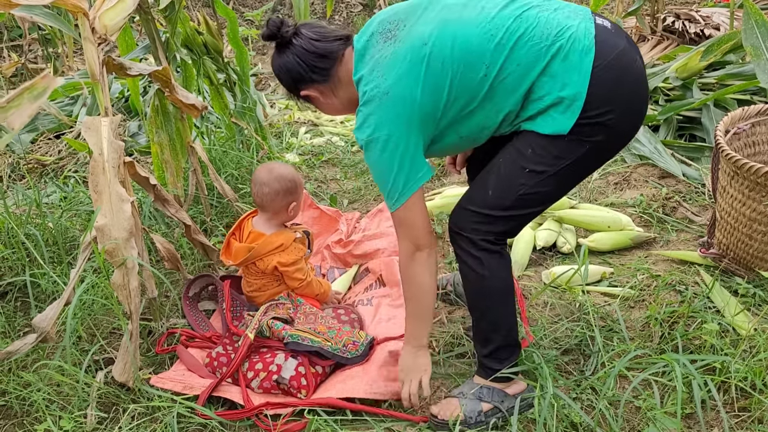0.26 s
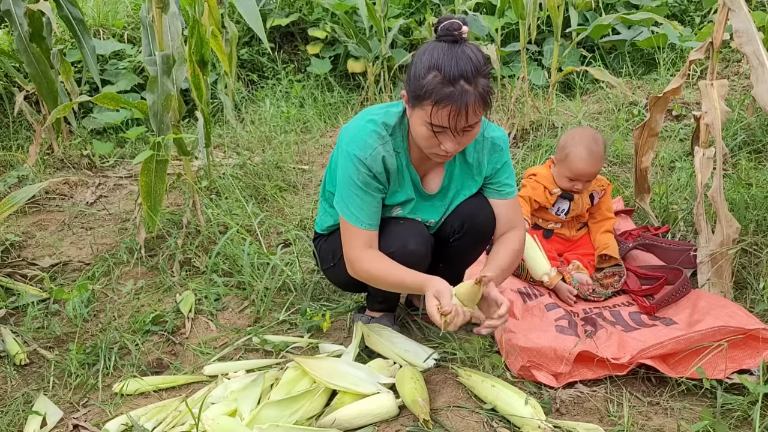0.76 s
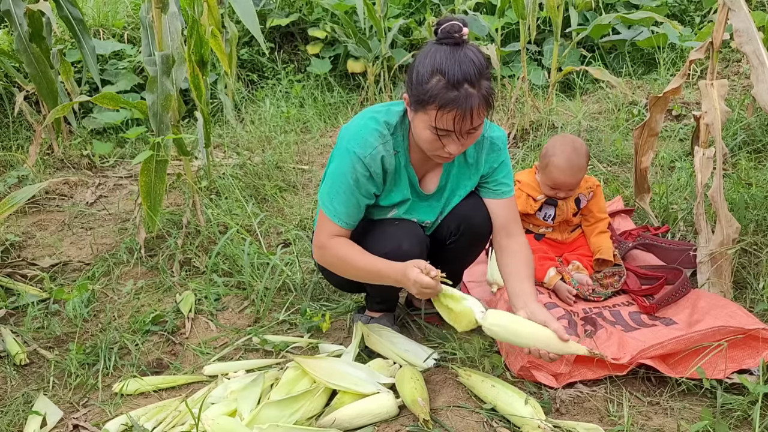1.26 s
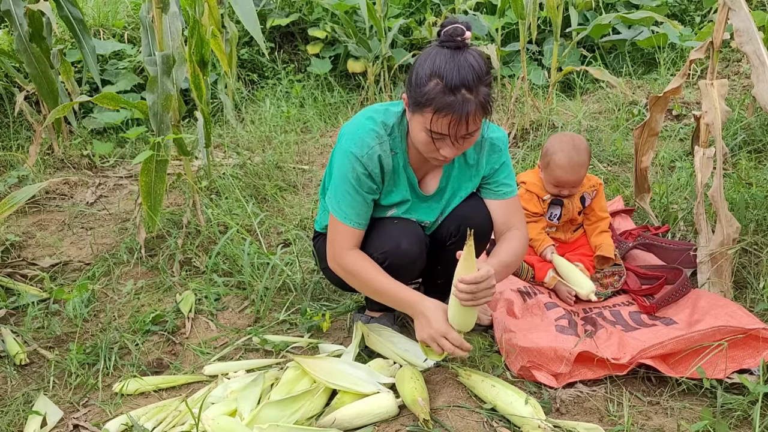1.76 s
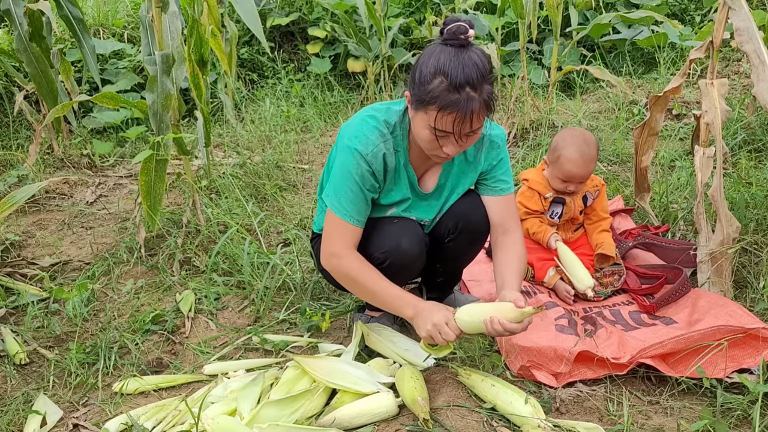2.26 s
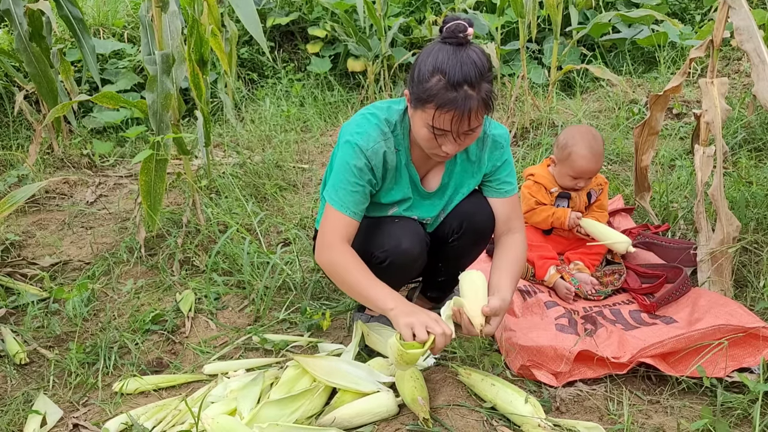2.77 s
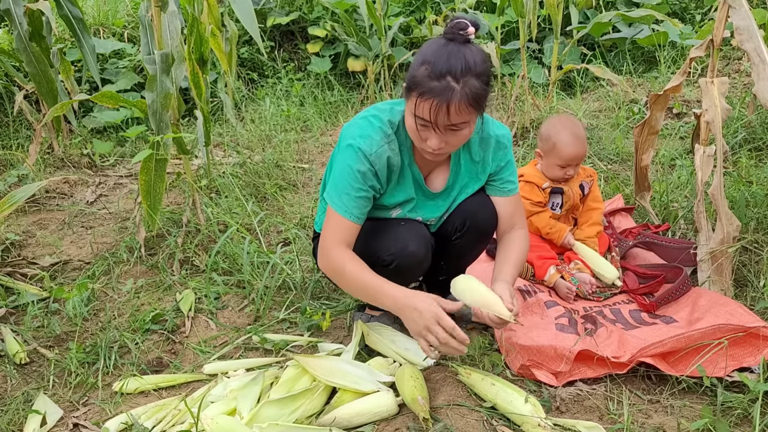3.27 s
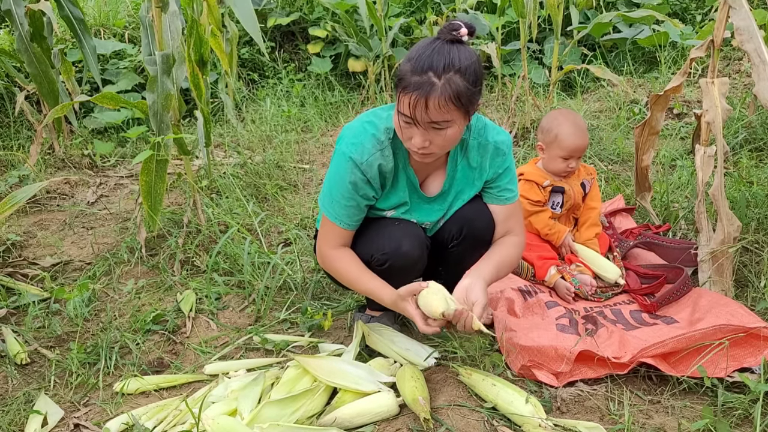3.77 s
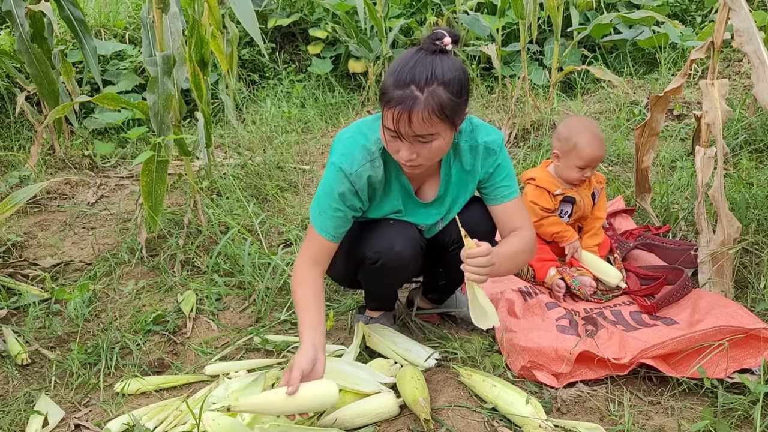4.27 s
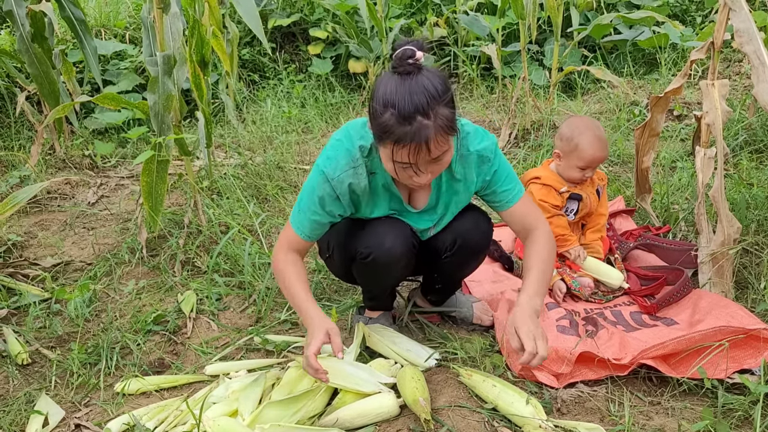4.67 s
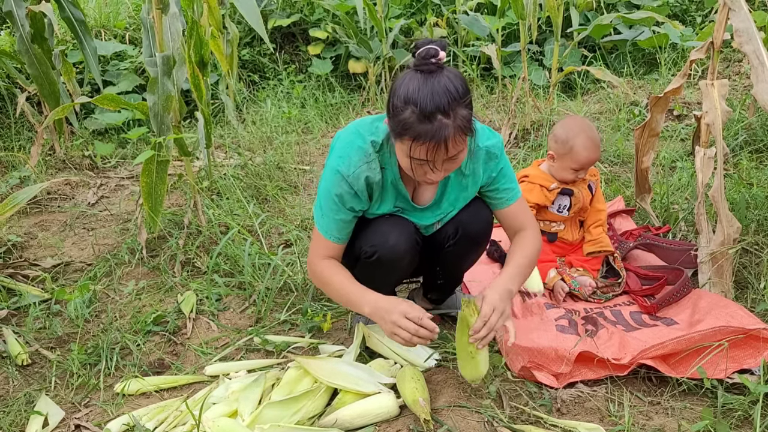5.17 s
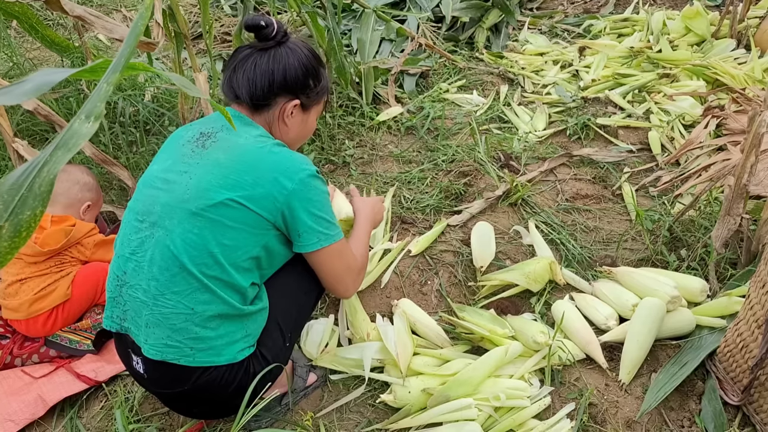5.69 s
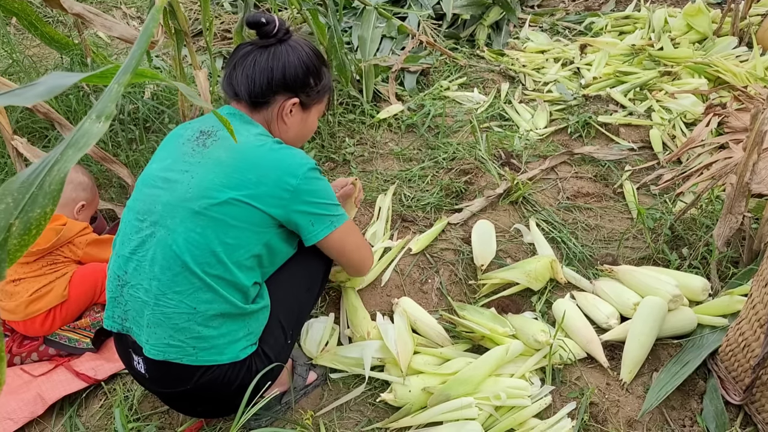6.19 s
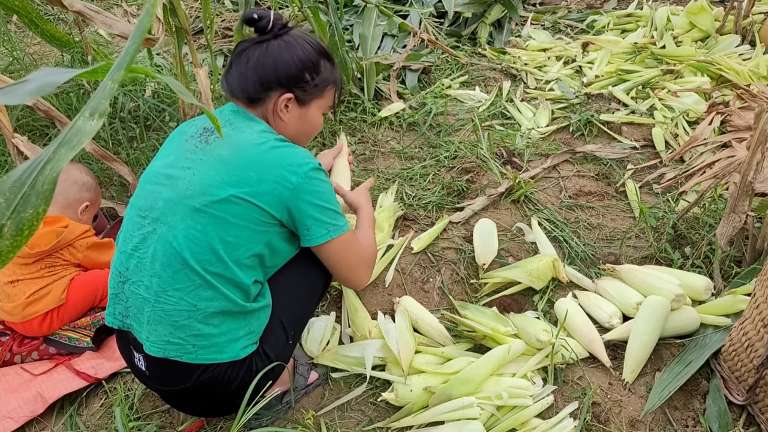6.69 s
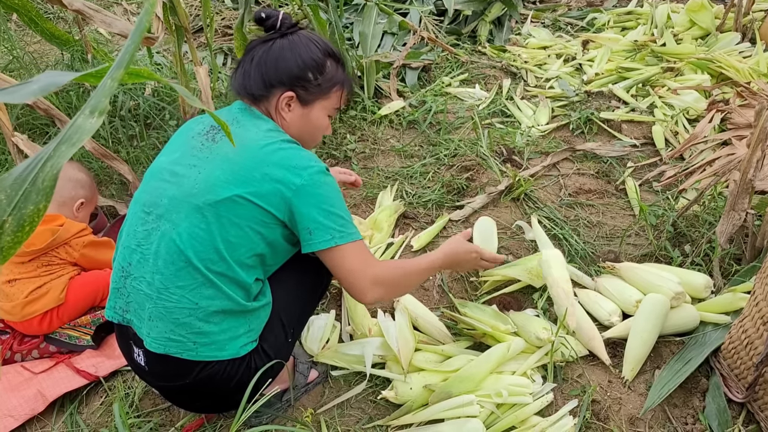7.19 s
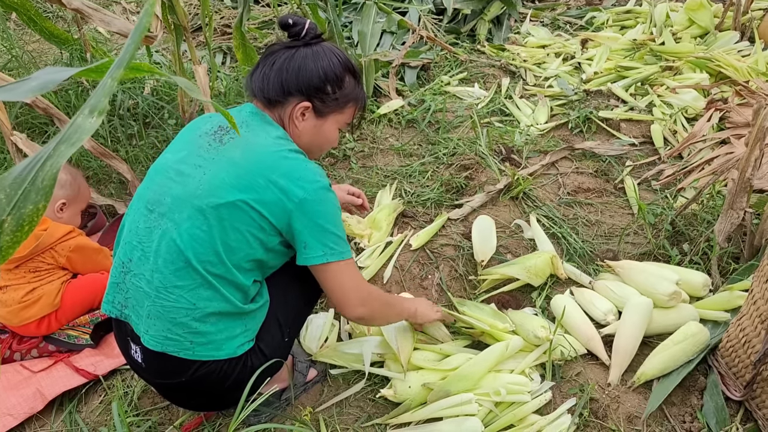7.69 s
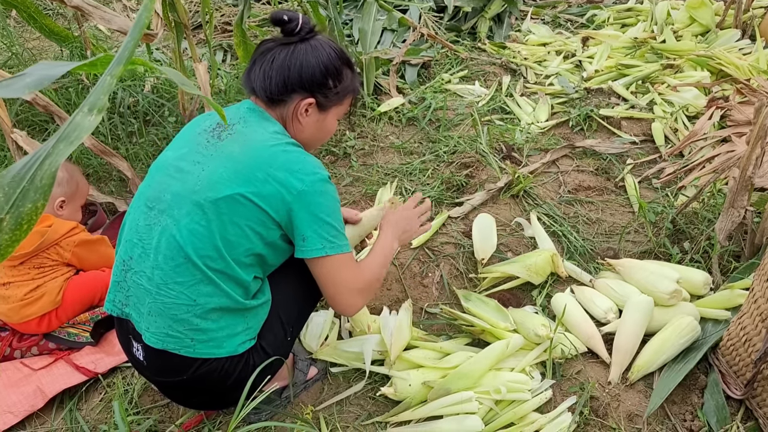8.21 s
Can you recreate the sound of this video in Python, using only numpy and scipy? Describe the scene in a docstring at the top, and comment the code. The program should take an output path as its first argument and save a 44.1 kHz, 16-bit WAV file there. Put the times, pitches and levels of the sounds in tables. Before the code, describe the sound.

Green husk leaves rip and crackle loudly, then rustle quietly with scattered snaps and dull cob knocks, faint insects and low air around.

```python
"""Fresh corn is husked by hand close to the microphone, at the edge of a field.
Leaves rip in clumps of tiny fibre breaks coloured by leaf resonances; stalks snap as ringing bursts,
and cobs and hands knock as damped modes. Crickets pulse as raspy tones in the grass, far birds chip
in gliding tones, and filtered noise makes a rumble of air, a soft hush and a faint hiss.
The sound drops out briefly past the middle; after that the work is heard from behind the body."""
import sys
import numpy as np
from scipy import signal
from scipy.fft import rfft, irfft, next_fast_len
from scipy.io import wavfile
from scipy.ndimage import uniform_filter1d

SR = 44100
rng = np.random.default_rng(int(sys.argv[2]) if len(sys.argv) > 2 else 0)


def dump_mix(stems):
    """Bounce the given channels to the path in sys.argv[1] as a 16-bit WAV at rate SR."""
    frames = np.atleast_2d(stems).T  # one column per channel
    limited = np.clip(frames, -1, 1)  # hard clip at full scale
    pcm = np.round(limited * 32767).astype(np.int16)
    wavfile.write(sys.argv[1], SR, pcm)


N = 372644
TIME = np.arange(N) / SR
DROPOUT_START_S, DROPOUT_END_S = 5.53, 5.586

# colour of a flexing leaf, also of snaps: (frequency [Hz], relative level [dB])
LEAF_SPECTRUM = [(100, -16.5), (300, -7), (470, -13), (760, -3), (1080, -7), (1280, 3), (1800, -1),
                 (2400, -4), (2900, -10), (4000, -17.5), (8000, -63.5)]
# colour of parting fibres, also of snaps: (frequency [Hz], relative level [dB])
FIBRE_SPECTRUM = [(500, -46), (1800, -15.5), (2800, -7), (3400, -5.5), (4600, 1), (5600, -1), (6600, -2.5),
                  (7800, -1), (8800, -6.5), (10200, -3), (11700, -0.5), (13500, -5.5), (15500, -4.5)]
# broad resonances of a husk leaf, strongest when only rubbed: (frequency [Hz], width [Hz], relative gain)
LEAF_RESONANCES = [(1910, 600, 1.08), (4400, 800, 0.95)]
MIDDLING_DB = -51   # fibre level of a middling stroke, before the trim
FLEX_OCTAVES = 0.06   # spread of the resonances as the leaf bends


def tearing(middling_breaks_per_s=2600, tear_db=-30):
    """A harder pull breaks more fibres and shakes the whole leaf; a light rub sounds mostly its resonances."""
    leaf_db, fibre_db = pulling()
    force = 1 / (1 + from_db(tear_db - fibre_db))   # 0 rubbing, 1 ripping
    breaks_per_s = middling_breaks_per_s * from_db(.4 * (fibre_db - MIDDLING_DB))
    breaks = fibre_breaks(breaks_per_s, spread_db=1.0, clump_db=1.24, friction=0.4)
    leaf = colour(breaks * from_db(leaf_db - 4.5), LEAF_SPECTRUM)
    fibres = colour(breaks * from_db(fibre_db - 3.0), FIBRE_SPECTRUM)
    ring = 0
    for hz, width_hz, gain in LEAF_RESONANCES:
        bent_hz = hz * 2 ** (FLEX_OCTAVES * drift(25))
        ring = ring + gain * from_db(0.83 * drift(12)) * gliding_resonance(leaf + fibres, bent_hz, width_hz)
    return fibres + leaf * (1 + force) / 2 + ring * (1 - force)


# strokes of the hands on the husk, levels before the trims in tearing():
# (time [s], length [s], flexing leaf level [dB], parting fibre level [dB], swell from start to end [dB])
HAND_STROKES = [(0.299, 0.07, -60.5, -58, 5), (.48, 0.074, -59.5, -58.5, -1),
                (0.606, 0.031, -50.5, -52.5, -8), (0.777, 0.1, -57, -59.5, -14),
                (0.948, 0.093, -56.5, -54, 22), (1.116, 0.044, -38, -28, 5), (1.149, 0.074, -28, -30, 0),
                (1.225, 0.095, -29.5, -30, 6.5), (1.499, 0.063, -56.5, -55, -4),
                (1.597, 0.12, -60.5, -54.5, 17), (1.73, 0.35, -60, -55.5, -2.5),
                (2.737, 0.135, -47.5, -35, 10), (2.89, 0.044, -43.5, -38.5, 6),
                (2.948, 0.11, -51.5, -41, -1), (3.034, 0.29, -53.5, -48, 9), (3.544, .2, -51.5, -50, 6),
                (3.902, 0.078, -48, -55.5, 10.5), (3.968, 0.11, -44, -43.5, 5),
                (4.081, 0.032, -40.5, -36, 10), (4.545, 0.088, -49.5, -45.5, -4),
                (4.666, 0.049, -52, -51.5, 4), (4.915, 0.2, -68, -60.5, -4.5),
                (5.233, 0.078, -48, -50.5, 3), (5.346, 0.11, -61.5, -63, 1), (5.783, 0.12, -54.5, -55, 4.5),
                (5.941, 0.21, -60, -53.5, -0.5), (6.379, 0.081, -60, -59.5, 11),
                (6.481, 0.15, -48, -48.5, -5.5), (6.732, 0.19, -55.5, -53, -8),
                (7.335, 0.057, -50, -46.5, -17), (7.407, 0.13, -50, -48.5, -6),
                (7.588, 0.057, -57.5, -52, 7.5), (7.741, 0.22, -57.5, -54, 4.5),
                (8.136, 0.063, -58.5, -56.5, -0.5)]
HELD_LEAF_DB, HELD_FIBRE_DB = -70.5, -71   # husk merely held between strokes, before the same trims
ATTACK_SHARE = .25   # share of a stroke in which the grip builds up
# release rate after a middling stroke; harder pulls let go faster, by this many dB per dB
MIDDLING_RELEASE_DB_PER_S, RELEASE_FOLLOWS = 340.5, 0.3


def pulling():
    """Each stroke grips, swells or slackens as the leaf slides, then lets go: leaf and fibre level in dB."""
    power = from_db([[HELD_LEAF_DB], [HELD_FIBRE_DB]]) ** 2 * np.ones(N)
    t = np.arange(SR) / SR
    for s, length, leaf_db, fibre_db, swell_db in HAND_STROKES:
        grip = np.minimum(t / (ATTACK_SHARE * length), 1)
        release_rate = MIDDLING_RELEASE_DB_PER_S * from_db(RELEASE_FOLLOWS * (fibre_db - MIDDLING_DB))
        release_db = release_rate * np.maximum(t - length, 0)
        slide_db = swell_db * (np.minimum(t / length, 1) - .5)
        envelope = grip * from_db(slide_db - release_db)
        add(power, s, (from_db([[leaf_db], [fibre_db]]) * envelope) ** 2)
    return 10 * np.log10(power)


def fibre_breaks(per_s, spread_db, clump_db, friction):
    """Tiny breaks of uneven size come in clumps, over the smooth rub of leaf on leaf."""
    born = rng.random(N) < per_s / SR
    sizes = born * from_db(spread_db * np.minimum(rng.exponential(1, N), 4))
    # even out the running level, so that the strokes alone set it
    sizes = sizes / np.sqrt(uniform_filter1d(sizes ** 2, size=1500).clip(0) + 1e-6)
    breaks = (sizes + friction) * stereo_noise(N) * catches() * from_db(clump_db * drift(220))
    return breaks / np.sqrt(uniform_filter1d(np.mean(breaks ** 2, axis=0), size=1500) + 1e-9)


def catches(per_s=130, size=1.5, release_s=0.0011):
    """A thicker fibre holds now and then, and gives way with a fine tick: a gain that jumps and dies down."""
    gives = (rng.random(N) < per_s / SR) * np.minimum(rng.exponential(1, N), 2)
    return 1 + size * signal.lfilter([1], [1, -np.exp(-1 / (release_s * SR))], gives + 1e-18)


def hand_echo(x, share, delay_s, travel=.25):
    """A reflection off the moving hands and the ground: its comb shifts the colour."""
    late = delay_s * (1 + travel * drift(6))
    return x + share * np.array([np.interp(TIME - late, TIME, side) for side in x])


# ribs and stalks that break close by: (time [s], level before placing [dB], ring frequency [Hz])
STALK_SNAPS = [(0.617, -46.5, 2160), (.892, -45, 7300), (0.962, -41, 4540), (1.038, -35.5, 9400),
               (1.05, -31.5, 9100), (1.15, -22.5, 4600), (1.186, -24.5, 9150), (1.2393, -14.5, 1310),
               (1.2556, -19, 1290), (1.269, -13.5, 1570), (1.2823, -18.5, 1560), (1.294, -19, 2060),
               (1.302, -21, 1380), (1.309, -21.5, 4500), (1.319, -17.5, 2590), (1.798, -43, 1940),
               (1.811, -38.5, 2150), (1.906, -23.5, 9200), (2.049, -42, 4260), (2.156, -39.5, 6800),
               (2.3757, -13.5, 2050), (2.383, -17, 1400), (2.3889, -13, 2860), (2.397, -21, 2100),
               (2.407, -25.5, 2700), (2.8647, -29.5, 2220), (2.926, -33.5, 5970), (2.939, -45, 7000),
               (3.152, -40, 4800), (3.289, -34, 2190), (4.5545, -35.5, 3840), (4.568, -29.5, 4000),
               (4.718, -48, 2200), (5.608, -37.5, 4190), (5.849, -38.5, 1400), (6.053, -35, 5270),
               (6.2168, -16, 1810), (6.218, -17.5, 4840), (6.2212, -20, 3070), (6.634, -46, 2480),
               (6.873, -46, 2430), (7.3512, -38.5, 5700), (7.43, -34.5, 10900), (7.498, -37.5, 8950),
               (7.636, -43.5, 11000), (7.92, -41, 4650), (8.16, -46, 2380)]
# thick pieces ring below EVEN_HZ and sound the leaf, thin ones above it and sound the fibres
EVEN_HZ, FIBRE_LEAD_DB, LEAD_OCTAVES = 2000, 17, 1.5


def snapping(ring_gain=2.7, ring_width=0.19, size=2048):
    """Each broken piece rings at its own pitch, and thinner pieces are brighter."""
    t, out = np.arange(size) / SR, np.zeros((2, N))
    for s, db, hz in STALK_SNAPS:
        burst = fracture(t)
        burst = burst + ring_gain * resonance(burst, hz, ring_width * hz)
        bright = from_db(FIBRE_LEAD_DB * np.tanh(np.log2(hz / EVEN_HZ) / LEAD_OCTAVES))
        for spectrum, share in (LEAF_SPECTRUM, 1), (FIBRE_SPECTRUM, bright):
            part = colour(burst, spectrum)
            part = part / np.std(part[:, t < .006])   # the level is that of the first instant
            add(out, s, from_db(db) * share / np.hypot(1, bright) * part)
    return out


SPLINTER_S, SPLINTER_SPREAD_DB = 0.0033, 3   # decay time constant of the splintering; its unevenness


def fracture(t, pulse=3.0, crack=1.0, crack_s=.0009):
    """One sharp pulse and a brief crack as the piece gives way, then splinters that die out."""
    unevenness = from_db(SPLINTER_SPREAD_DB * rng.standard_normal(len(t)).clip(-2, 2))
    splinters = np.exp(-t / SPLINTER_S) * unevenness
    crack_fade = np.exp(-t / crack_s)
    return pulse * (t == 0) + stereo_noise(len(t)) * (crack * crack_fade + splinters * (1 - crack_fade))


# soft knocks of cobs and hands, before placing: (time [s], level [dB], ring frequency [Hz],
# 60 dB decay time [s], share of dull noise [0-1], shift to the right [dB])
SOFT_KNOCKS = [(2.383, -18.5, 391, 0.029, 0.86, -2), (3.285, -41.5, 685, 0.25, 0.6, 0),
               (5.275, -43, 806, 0.19, 0.8, 0), (4.569, -32.5, 700, 0.076, 0.9, 1.5),
               (4.575, -33, 196, 0.18, 0.4, -1), (5.8045, -33, 995, 0.026, 0, 3),
               (6.217, -20, 320, 0.056, 0.26, -4), (6.3702, -32.5, 1005, 0.028, 0.14, 6),
               (6.544, -7.5, 815, 0.0016, 0.2, 13), (7.338, -30, 305, 0.075, 0.26, 0),
               (7.3515, -19.5, 910, 0.0087, 0.6, -5), (7.352, -22, 230, 0.07, 0.31, -3)]
SOFT_CONTACT_HZ = 2300   # padded by leaves, a knock falls off steeply above this


def knocking():
    """Each soft contact is one quickly damped mode and a dull puff of crushed leaves around it."""
    t, out = np.arange(SR // 4) / SR, np.zeros((2, N))
    for s, db, hz, t60, puff, right_db in SOFT_KNOCKS:
        crushed = rms_one(resonance(stereo_noise(len(t)), hz, hz))
        body = (1 - puff) * np.sin(2 * np.pi * hz * t) + puff * crushed
        onset = 1 - np.exp(-t / (0.019 * t60))
        sides = from_db([[-right_db / 2], [right_db / 2]])
        add(out, s, from_db(db - 60 * t / t60) * onset * body * sides)
    return signal.sosfilt(signal.butter(4, SOFT_CONTACT_HZ, fs=SR, output="sos"), out + 1e-18)


# crickets in the grass: (start time [s], end time [s], level before swell and mix [dB],
# middle pitch [Hz], mean pulse rate [1/s], rasp [0-1])
GRASS_CRICKETS = [(.6166, 5.16, -51.7, 7160, 23.71, .4), (0, 8.45, -67.5, 7430, 23.0, .8)]
WING_LEAD, WARM_UP_S = 0.05, 0.33   # share of a beat already done at the start; build-up and die-down time
WING_BUZZ = .4   # steady part of the rasp, against a pulse peak of about 1


def crickets(duty=0.46, fall_hz=180, rasp_width_hz=330):
    """Each closing of the wings gives a short, slightly falling, raspy tone; no two are equally strong."""
    out = np.zeros((2, N))
    for start, end, db, hz, per_s, rasp in GRASS_CRICKETS:
        beat = ((TIME - start) * per_s + 0.11 * rasp * drift(2.4) + WING_LEAD) % 1
        stroke = np.minimum(beat / duty, 1)
        closing = np.sin(np.pi * stroke) * from_db(1.5 * drift(per_s))
        tone = np.sin(2 * np.pi * np.cumsum(hz + fall_hz * (.5 - stroke)) / SR)
        scrape = resonance(rng.standard_normal((2, N)), hz, rasp_width_hz)
        scrape = rms_one(resonance(scrape, hz, rasp_width_hz))
        warm_up = np.clip(np.minimum(TIME - start, end - TIME) / WARM_UP_S, 0, 1) ** .5
        swell = warm_up * from_db(drift(1.6))
        out += from_db(db) * swell * ((1 - rasp) * tone * closing + rasp * scrape * (closing + WING_BUZZ))
    return out


# far birds: (time [s], peak level [dB], first pitch [Hz], last pitch [Hz], length [s]), pitches before the arch
FAR_CHIRPS = [(2.274, -51.5, 6070, 5620, 0.05), (4.948, -51, 5830, 5500, 0.038),
              (5.915, -63, 10400, 10800, 0.11), (6.01, -54, 11500, 10500, 0.14),
              (6.998, -60, 4800, 6400, 0.05), (7.296, -59, 5400, 5080, 0.042)]


def birds(arch_hz=900, quaver_hz=950):
    """Thin chips that arch from one pitch to another, with a random quaver."""
    out = np.zeros((2, N))
    for s, db, from_hz, to_hz, length in FAR_CHIRPS:
        u = np.arange(int(length * SR)) / (length * SR)
        quaver = quaver_hz * rng.standard_normal(len(u))
        pitch = from_hz + (to_hz - from_hz) * u + arch_hz * np.sin(np.pi * u) + quaver
        add(out, s, from_db(db) * np.sin(np.pi * u) * np.sin(2 * np.pi * np.cumsum(pitch) / SR))
    return out


# puffs of moving air: (time [s], rise of the rumble [dB], time from the peak to 1/e of the rise [s])
AIR_GUSTS = [(0.058, 11, 0.42), (5.404, 12, 0.056), (5.825, 10, 0.083), (7.701, 4.5, 0.25)]
# level of the soft background hush, which sinks and recovers, before its gain: (time [s], level [dB])
HUSH_CURVE = [(0.0, -63.5), (0.47, -62), (0.75, -70.5), (1.03, -67.5), (1.15, -63), (2.26, -73.5),
              (2.8, -73.5), (3.01, -68), (3.25, -66.5), (4.4, -69.5), (5.27, -60.5), (5.53, -64.5),
              (6.38, -59.5), (8.45, -67.5)]
# wandering band where the hush is strongest: (time [s], centre frequency [Hz])
HUSH_BAND = [(1.2, 700), (3.2, 801), (4.4, 1150), (5.4, 1110), (7.3, 720)]
# colour of the rumble: (frequency [Hz], relative level [dB])
RUMBLE_SPECTRUM = [(22, -20.5), (48, -4), (63, 3.5), (80, -7), (105, -4.5), (150, -15), (250, -24),
                   (450, -38.5), (1000, -68)]
# colour of the hush: (frequency [Hz], relative level [dB])
HUSH_SPECTRUM = [(100, -26), (250, 5), (450, -5.5), (1000, -4), (1700, -15), (2500, -15), (4000, -23.5)]
# colour of the hiss: (frequency [Hz], relative level [dB])
HISS_SPECTRUM = [(2500, -9), (3400, -11.5), (4500, -10.5), (7400, -1), (9000, -8), (12000, -5.5),
                 (15500, -11.5)]
RUMBLE_DB, HUSH_DB, HISS_DB = -49, 2, -66   # rumble between gusts; gain of the hush over its curve; hiss


def air():
    """Lumpy low rumble that rises with each gust, a soft hush of changing level and a faint hiss."""
    gust_db = sum(db * np.exp(-((TIME - s) / half) ** 2) for s, db, half in AIR_GUSTS)
    lumps_db = 1.6 * drift(14)
    hush_db, = in_time(HUSH_CURVE)
    centre_hz, = in_time(HUSH_BAND)

    def layer(db, spectrum):
        """Wide noise of one colour and level."""
        return from_db(db) * colour(stereo_noise(N, FAR_LIKENESS), spectrum)

    rumble = layer(RUMBLE_DB + gust_db + lumps_db, RUMBLE_SPECTRUM)
    hush = layer(HUSH_DB + hush_db + 0.93 * lumps_db, HUSH_SPECTRUM)
    hiss = layer(HISS_DB, HISS_SPECTRUM)
    return rumble + hush + 1.11 * gliding_resonance(hush, centre_hz, width_hz=300) + hiss


def field(x, scatter_db, t60, likeness, count=3, size=8192):
    """Ground and standing plants scatter a short tail back, along paths that change as things move."""
    t = np.arange(size) / SR
    fade = from_db(-60 * t / t60) * (1 - np.exp(-t / 0.0014))
    paths = np.array([drift(20) for _ in range(count)])
    paths = paths / np.linalg.norm(paths, axis=0)
    tails = sum(convolve(x * path, rms_one(stereo_noise(size, likeness) * fade)) for path in paths)
    return x + from_db(scatter_db) * tails / np.sqrt(size)


def place(x, right_db, lag):
    """Shift a sound to the right in level; the right side lags by so many samples."""
    right = np.interp(np.arange(N) - lag, np.arange(N), x[1])
    return np.array([x[0], right]) * from_db([[-right_db / 2], [right_db / 2]])


# likeness of the two sides for the work close by: (frequency [Hz], likeness [0-1])
NEAR_LIKENESS = [(700, 0.96), (1400, .8), (2800, 0.2), (5000, 0.1)]
# likeness of the two sides for the field around: (frequency [Hz], likeness [0-1])
FAR_LIKENESS = [(25, .75), (70, 0.93), (600, 0.5), (1500, 0.19), (5000, .05)]


def stereo_noise(size, likeness=NEAR_LIKENESS):
    """White noise, alike on both sides in the bass and largely unrelated in the treble."""
    padded = next_fast_len(size, True)
    mid, side = rfft(rng.standard_normal((2, padded)))
    alike = np.clip(at_hz(likeness, np.fft.rfftfreq(padded, 1 / SR)), 0, 1)
    both = np.sqrt((1 + alike) / 2) * mid + np.sqrt((1 - alike) / 2) * side * [[1], [-1]]
    return irfft(both, padded)[:, :size]


def colour(x, spectrum, size=4096):
    """Causal (minimum-phase) filter with this spectrum and unit energy."""
    cepstrum = irfft(np.log(from_db(at_hz(spectrum, np.fft.rfftfreq(size, 1 / SR)))))
    # folding the cepstrum onto positive times makes the phase minimal
    cepstrum[1:size // 2] *= 2
    cepstrum[size // 2 + 1:] = 0
    response = irfft(np.exp(rfft(cepstrum)))
    return convolve(x, response / np.linalg.norm(response))


def resonance(x, hz, width_hz):
    """Two-pole resonance with gain 1 on top."""
    r = np.exp(-np.pi * width_hz / SR)
    zeros = np.array([1, 0, -1]) * (1 - r * r) / 2
    return signal.lfilter(zeros, [1, -2 * r * np.cos(2 * np.pi * hz / SR), r * r], x)


def gliding_resonance(x, hz, width_hz):
    """A resonance whose centre follows a curve; gain 1 on top."""
    turn = np.exp(2j * np.pi * np.cumsum(hz) / SR)
    r = np.exp(-np.pi * width_hz / SR)
    # shift the centre to 0 Hz, smooth, and shift back
    return 2 * np.real(turn * signal.lfilter([1 - r], [1, -r], x * turn.conj()))


def convolve(x, response):
    """Filter along time, keeping the length."""
    return signal.oaconvolve(np.atleast_2d(x), np.atleast_2d(response), axes=-1)[:, :x.shape[-1]]


def drift(rate):
    """Smooth chance with rms 1, with so many knots a second."""
    knots = rng.standard_normal(int(9 * rate) + 2)
    return rms_one(np.interp(TIME * rate, np.arange(len(knots)), knots))


def add(out, s, sound):
    """Mix a short sound in at time s."""
    start = max(int(s * SR), 0)
    out[:, start:start + sound.shape[-1]] += sound[..., :N - start]


def from_db(db):
    """Decibels to gain."""
    return 10 ** (np.asarray(db) / 20)


def rms_one(x):
    """Scale to rms 1."""
    return x / np.sqrt(np.mean(x ** 2) + 1e-20)


def in_time(rows):
    """Each column of a curve at every sample."""
    s, *columns = np.transpose(rows)
    return [np.interp(TIME, s, c) for c in columns]


def at_hz(points, hz):
    """Read a spectrum on a log-frequency axis."""
    f, value = np.transpose(points)
    return np.interp(np.log(hz + 1), np.log(f), value)


# colour of the work heard from behind the body: (frequency [Hz], relative level [dB])
BEHIND_SPECTRUM = [(600, 3), (1150, -0.5), (1800, -2), (2700, 1), (3900, -6.5), (5400, 3), (7500, 1.5),
                   (12000, -3)]


def scene():
    """The work is close and a little to the right of the microphone; the field lies all round."""
    rustle = from_db(-.9) * hand_echo(tearing(), share=.5, delay_s=.0011)
    husks = field(rustle + snapping(), scatter_db=-4.5, t60=0.084, likeness=NEAR_LIKENESS)
    knocks = knocking()
    front = place(husks + knocks, right_db=2.1, lag=-2.9)
    behind = place(from_db(-2.0) * colour(husks, BEHIND_SPECTRUM) + knocks, right_db=4.5, lag=0.74)
    work = np.where(TIME < DROPOUT_START_S, front, behind)
    wildlife = field(crickets() + birds(), scatter_db=-4.5, t60=0.17, likeness=FAR_LIKENESS, count=2)
    return work + wildlife + place(air(), right_db=1.15, lag=3.9)


PEAK_LIMIT, CUTOFF_HZ = .85, 15800   # level that rounded peaks approach; top of the treble


def record(dry):
    """Peaks are rounded, the sound drops out briefly and the top is cut."""
    sounding = (TIME < DROPOUT_START_S) | (TIME > DROPOUT_END_S)
    gate = np.maximum(uniform_filter1d(1. * sounding, size=200), .004)   # soft edges, a trace left
    rounded = dry / (1 + (dry / PEAK_LIMIT) ** 4) ** .25
    top_cut = signal.ellip(10, .1, 80, CUTOFF_HZ, fs=SR, output="sos")
    return signal.sosfilt(top_cut, rounded * gate)


dry = scene()
out = record(dry)
dump_mix(out)
```